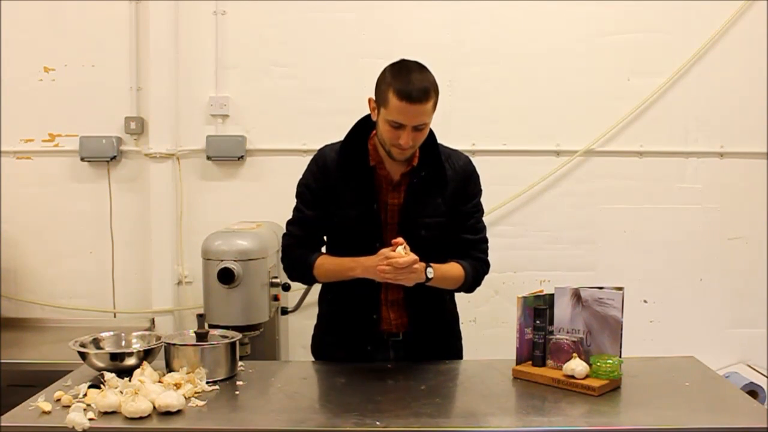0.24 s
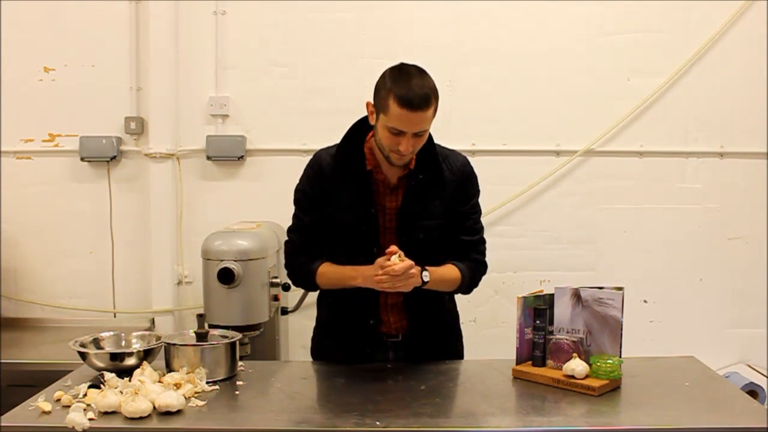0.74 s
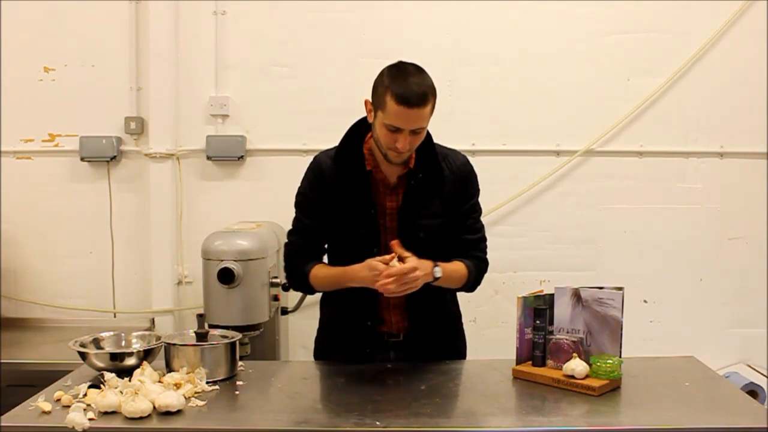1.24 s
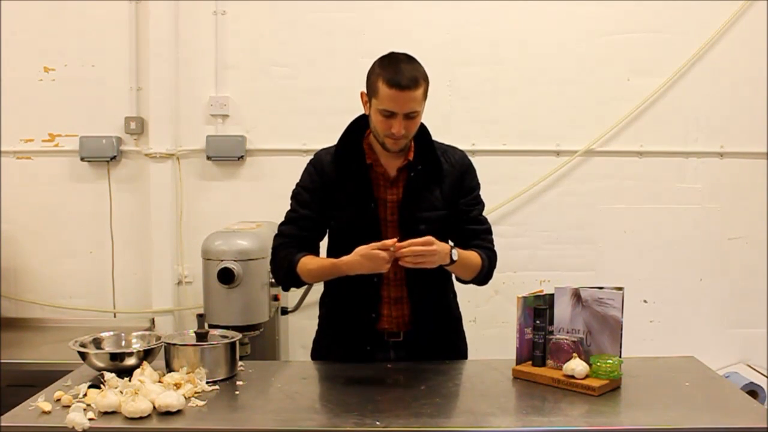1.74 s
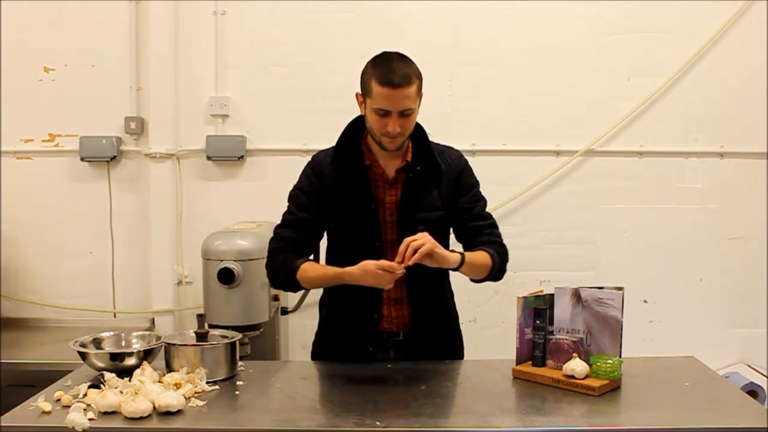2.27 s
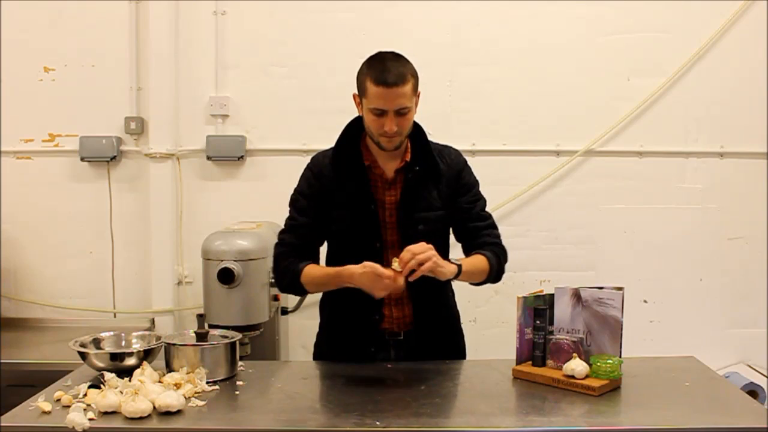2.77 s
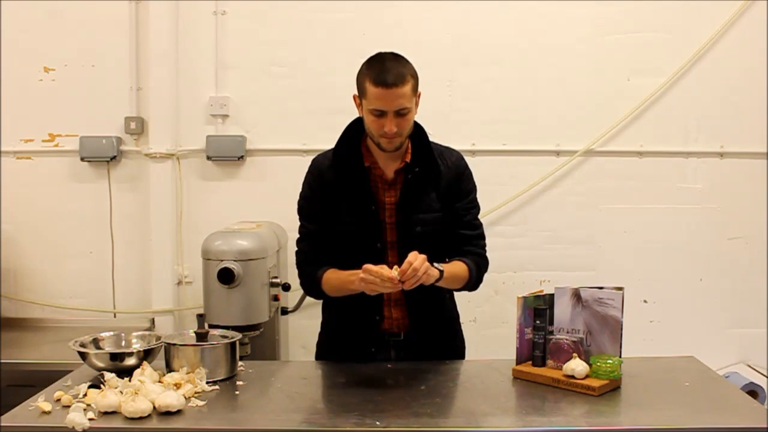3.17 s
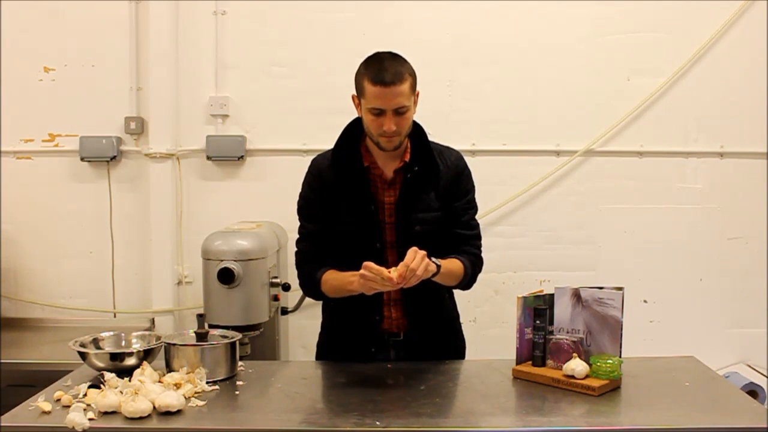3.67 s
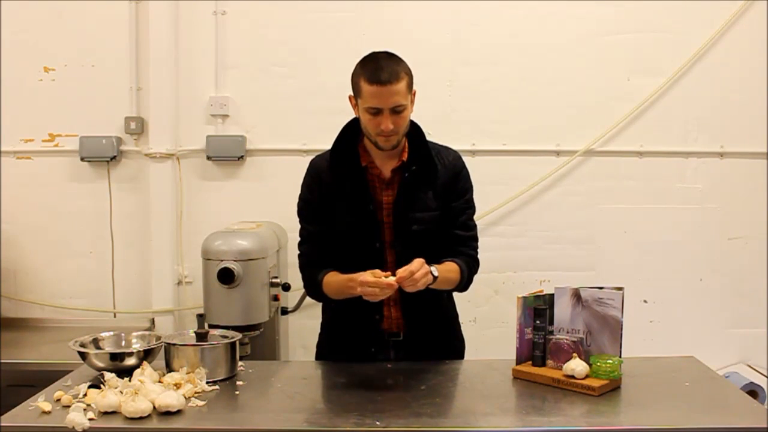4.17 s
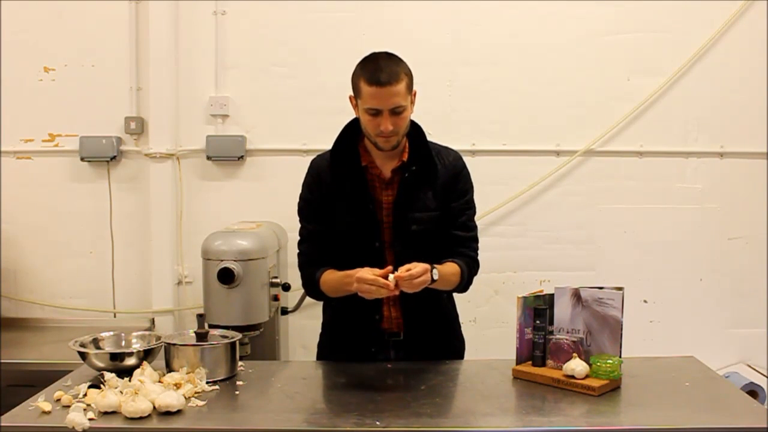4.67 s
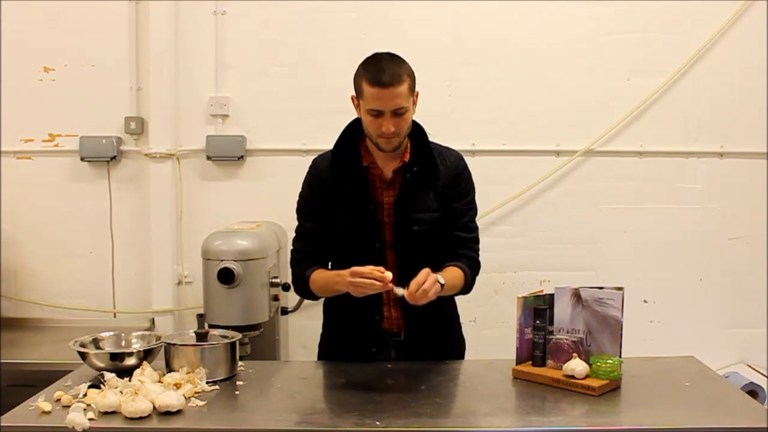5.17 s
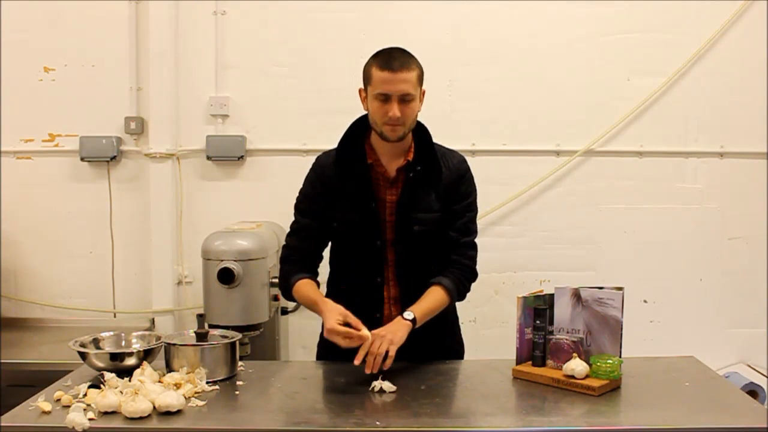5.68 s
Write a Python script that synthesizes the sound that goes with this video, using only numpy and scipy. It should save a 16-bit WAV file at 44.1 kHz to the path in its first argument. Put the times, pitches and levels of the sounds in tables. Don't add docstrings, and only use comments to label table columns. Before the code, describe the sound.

A distant mono microphone hears fingers working dry garlic skin in a bare, hard-surfaced kitchen. Very short, bright snaps begin almost at once, with a strong crack near 0.45 s and several more between 0.7 and 1.1 s. From about 1.4 to 2.2 s there are mostly faint ticks, then a quick cluster at 2.3 s and another at 2.6 s. Tearing starts around 3.05 s with a rapid run of crisp crackles and papery rustle, followed by strong snaps at 3.65 and 4.13 s, the loudest. Activity thins after 4.4 s, returns as a sharp burst at 4.9-5.15 s, and ends with small cracks and soft dull knocks near 5.5 s. Each snap bounces off bench and walls, leaving a thin tail of up to a second. Underneath is quiet, steady ventilation, a wavering low hum, and a trace of distant traffic rumble fading at the start. Only room air remains to about 5.9 s.

```python
import sys
import numpy as np
from scipy import signal
from scipy.fft import rfft, irfft
from scipy.io import wavfile
from scipy.ndimage import uniform_filter1d

SR = 44100
rng = np.random.default_rng(int(sys.argv[2]) if len(sys.argv) > 2 else 0)


def invert_db(x):
    u = np.asarray(x, float) / 20
    return 10 ** u


def store_wav(level_fs):
    pcm = np.round(np.clip(np.atleast_2d(level_fs), -1, 1) * 32767)
    wavfile.write(sys.argv[1], SR, pcm.T.astype(np.int16))


N = 260833
SNAP_SAMPLES = 512


def shaped(x, hz, db):
    f = np.maximum(np.fft.rfftfreq(len(x), 1 / SR), 1)
    gain = invert_db(np.interp(np.log(f), np.log(hz), db))
    return irfft(rfft(x) * gain, len(x))


def bump(hz, octaves):
    f = np.maximum(np.fft.rfftfreq(SNAP_SAMPLES, 1 / SR), 1)
    return np.exp(-0.5 * (np.log2(f / hz) / octaves) ** 2)


def ragged(decay_s, first):
    t = np.arange(SNAP_SAMPLES // 2) / SR
    burst = rng.standard_normal((len(decay_s), len(t))) * np.exp(-t / decay_s[:, None])
    burst[:, 0] = first
    spectrum = rfft(burst, SNAP_SAMPLES)
    return spectrum / np.abs(spectrum) ** 0.5


def snaps(times_s, peak_db, colours, decay_s, wet_db):
    out = np.zeros((2, N + SNAP_SAMPLES))
    lead = SNAP_SAMPLES // 8
    spectra = ragged(decay_s + 0 * times_s, 2.43) * colours
    waves = np.roll(irfft(spectra, SNAP_SAMPLES), lead, axis=1)
    waves *= (invert_db(peak_db) / np.abs(waves).max(axis=1))[:, None]
    for s, wave, wet in zip(times_s, waves, invert_db(wet_db + 0 * times_s)):
        i = max(int(s * SR) - lead, 0)
        out[:, i:i + SNAP_SAMPLES] += np.array([wave, wet * wave])
    return out[:, :N]


def skin_snaps(s, peak_db, ring_hz, ring_db, edge_hz, wet_db):
    ring = np.array([bump(f, 0.16) + 0.74 * bump(f, 0.72) for f in ring_hz])
    edge = np.array([0.95 * bump(f, 0.19) + 1.09 * bump(12200, 0.58) for f in edge_hz])
    colours = invert_db(ring_db + 9.5)[:, None] * ring + invert_db(-15) * edge
    return snaps(s + 0.0012, peak_db, colours, 0.00042, wet_db)


def contacts(rows, wet_db):
    s, peak_db, hz, octaves = np.transpose(rows)
    colours = np.array([bump(f, w) for f, w in zip(hz, octaves)])
    return snaps(s + 0.001012, peak_db, colours, 0.00051, wet_db)


def walk(rate_hz):
    k = int(SR / rate_hz)
    steps = np.repeat(rng.standard_normal(N // k + 1), k)
    smooth = uniform_filter1d(steps, k)[:N]
    return smooth / smooth.std()


# time in s, peak in dB, flake ring in Hz, ring # in dB, edge in Hz.
HARD_CRACKS = [(0.0874, -14.5, 5120, -14, 12100), (0.168, -26, 7600, -3, 7900),
               (.3537, -25, 5600, -38, 11000), (.451, -9, 4400, -24, 11800),
               (0.5197, -20, 5930, 2, 10300), (0.7246, -16, 6200, -8, 8440),
               (.733, -14.5, 3100, -22, 8600), (.817, -18.5, 5500, 1, 7900),
               (0.8262, -30, 4100, -2, 11200), (1.024, -25.5, 4200, -22, 12000),
               (1.0856, -17, 4170, -33, 13300), (1.4306, -24, 5100, -43, 12800),
               (2.294, -19.5, 4000, -20, 7500), (2.3138, -29, 3840, -10, 13100),
               (2.3245, -17, 4900, -17.5, 11100), (2.3342, -23.5, 5100, -30, 12500),
               (2.6038, -22.5, 5290, -23, 10800), (2.6194, -16.5, 5320, 0, 11500),
               (2.6424, -26, 5670, -16, 9250), (2.933, -27.5, 7600, -33, 8000),
               (3.049, -11.5, 6200, -31, 13500), (3.053, -22.5, 4100, -21, 14500),
               (3.0999, -19, 6950, -23, 9700), (3.107, -25, 7760, -30, 10500),
               (3.131, -15.5, 6300, -32, 13500), (3.1712, -29, 8000, -28, 11000),
               (3.182, -17.5, 8000, -33, 10400), (3.2138, -22, 5850, -19, 11500),
               (3.5133, -16.5, 6130, -23, 12000), (3.635, -25, 5650, -24, 12600),
               (3.6484, -9.5, 6510, -41, 12000), (3.7305, -14.5, 7460, -24, 9600),
               (3.756, -17.5, 6500, -16, 10100), (3.932, -19, 5350, -25.5, 14000),
               (4.0787, -16, 6600, -20, 12000), (4.107, -27, 7250, -3, 8800),
               (4.125, -7.5, 5450, -20.5, 8750), (4.171, -17, 7790, -20, 13500),
               (4.1817, -19, 5660, -11, 8810), (4.239, -17, 4600, -33, 12900),
               (4.2805, -20, 5200, -21, 13400), (4.292, -21, 5000, -18, 10400),
               (4.4166, -24, 6300, -20, 9500),
               (4.6395, -20.5, 6540, -9, 8780), (4.9197, -24.5, 8000, -38, 11000),
               (4.97, -19, 5100, -9.5, 10000), (5.005, -21, 5780, -18, 11600),
               (5.017, -25, 7440, -24, 9110), (5.0237, -15.5, 7700, -21, 9150),
               (5.107, -12.5, 7100, -17.5, 14700), (5.139, -11, 5700, -29.5, 12000),
               (5.4726, -22, 4740, -21, 9000), (5.5016, -24, 4560, -28, 9000)]


def cracks():
    s, peak_db, ring_hz, ring_db, edge_hz = np.transpose(HARD_CRACKS)
    wet_db = -1 - 0.028 * (peak_db + 15) + 0.05 * (ring_db + 14)
    return skin_snaps(s, peak_db, ring_hz, ring_db, edge_hz, wet_db)


# time in s, peak in dB, ring in dB.
TICKS = [(.192, -33, -8), (.3076, -43, -17), (0.3783, -33, -20), (0.5994, -34, -6), (.621, -28.5, -18),
         (0.9968, -31.5, -31), (1.1653, -35.5, -20), (1.513, -30.5, -19), (1.5378, -39, -10),
         (1.6346, -35.5, -16), (1.791, -30.5, -18), (1.8165, -38, -18), (1.9524, -34, -17),
         (2.011, -45, -24), (2.0767, -34, -10), (2.1112, -27, -20), (2.208, -43, -6), (2.2783, -31, -18),
         (2.4837, -28, -38), (2.7513, -29, -22), (3.2233, -34, -3), (3.6131, -25.5, -20),
         (3.6267, -25, -12), (3.8547, -27, -36), (3.925, -25.5, -27), (4.0916, -23, -2), (4.374, -27, -17),
         (4.804, -41.5, -11), (4.9114, -30, -36), (4.956, -26, -31)]
# time in s, ring in Hz.
PIECE_RING = [(.6, 4370), (1.2, 4430), (1.52, 5470), (1.8, 4700), (2.2, 3300), (2.75, 5300), (3.22, 4570),
              (3.6, 5700), (4.1, 6550), (4.8, 4100), (4.95, 6400)]


def ticks():
    s, peak_db, ring_db = np.transpose(TICKS)
    ring_hz = np.interp(s, *np.transpose(PIECE_RING))
    edge_hz = 11500 * np.exp(0.08 * rng.standard_normal(len(s)))
    return skin_snaps(s, peak_db, ring_hz, ring_db, edge_hz, wet_db=2)


# time in s, peak in dB, ring in Hz, width in octaves.
CLOVE_BODY = [(0.0876, -38, 1380, 0.58), (1.2, -47, 2490, 0.35), (0.4486, -43, 2800, .25),
              (.7321, -41, 3030, .35), (0.8175, -34, 2800, 0.79), (2.116, -33, 3940, 0.42),
              (2.3028, -30.5, 3730, 0.18), (3.05, -33.5, 2980, 0.48), (3.0975, -39, 2680, .55),
              (3.2126, -34.5, 2560, 0.63), (3.515, -39, 2040, 0.39), (3.6491, -36, 1870, 0.98),
              (3.9317, -40.5, 2050, 0.4), (4.123, -54, 2010, 0.3), (4.2445, -38.5, 2100, .22),
              (4.9703, -34.5, 2250, 0.36), (5.0223, -34, 2600, 0.98), (5.05, -43, 1200, 0.43),
              (5.106, -33.5, 2720, 1), (5.471, -30.5, 2550, 0.72)]


def clove_body():
    return contacts(CLOVE_BODY, wet_db=-0.2)


# time in s,
# peak in dB, ring in Hz, width in octaves.
FLAKES = [(.002, -38, 3000, 0.3), (.088, -36, 8000, 0.081), (.451, -34, 5900, 0.12),
          (.4535, -25, 4300, 0.34), (.451, -35.5, 3200, 0.25), (.4535, -31, 14300, .1),
          (1.086, -44.5, 4100, 0.09), (1.431, -40, 5280, 0.13), (1.513, -49, 5500, .086),
          (3.516, -40, 6030, .2), (3.514, -45, 1880, 0.18), (4.64, -29, 8900, 0.16),
          (4.97, -37, 5660, 0.13), (5.14, -37, 5500, 0.085)]


def flakes():
    octaves = np.transpose(FLAKES)[-1]
    return contacts(FLAKES, wet_db=9.5 - 35 * octaves)


# time in s, level in dB.
BENDING = [(0, -48.5), (.48, -54), (.66, -48), (1.002, -54.5), (1.9, -57.5), (2.04, -47), (2.58, -47),
           (2.88, -59), (3.21, -36.5), (3.36, -60.5), (3.69, -40), (3.92, -52.5), (4.25, -38), (4.76, -56),
           (5.1, -35.5), (5.28, -47.5), (5.43, -58), (5.91, -62)]


def rustle():
    t = np.arange(N) / SR
    hit, size = rng.random(N), rng.exponential(size=N)
    sign = np.sign(rng.standard_normal(N))
    clicks = (hit < 600 / SR) * invert_db(5.2 * np.minimum(size, 4)) * sign
    clicks = clicks / clicks.std()
    body = shaped(clicks, [1500, 2650, 4320, 6800, 9500], [-23, -10.5, -1.0, -5.0, -3.5])
    other_clicks = np.roll(clicks, N // 3)
    edge = shaped(other_clicks, [4960, 8000, 12000, 16000], [-16, -11.0, 0.5, -27])
    effort_db = np.interp(t, *np.transpose(BENDING))
    return invert_db(effort_db - 7.0) * (body + invert_db(-10.5) * edge)


# time in s, peak in dB, ring in Hz, width in octaves.
KNUCKLE_KNOCKS = [(3.837, -58, 781, 0.15), (3.889, -48.5, 740, 0.19), (3.926, -50, 810, .25),
                  (4.107, -32, 1770, 0.4), (4.789, -53, 1170, 0.092), (5.472, -42.5, 850, 0.46),
                  (5.49, -51.5, 260, 0.25), (5.498, -44, 1150, 0.18)]


def knuckles():
    return contacts(KNUCKLE_KNOCKS, wet_db=-1.6)


# delay in s, level in dB, smear in s.
ECHOES = [(.0019, -5.5, 0.00056), (.0046, -12, .0003), (.0093, -5, .0002), (0.0109, -9.5, 0.00034),
          (0.016, -19.5, .0005), (.021, -33, 0.00026), (0.032, -18, .0004)]
# centre in Hz, T60 in s, level in dB.
TAIL = [(1020, 0.79, -27.5), (2000, 1.07, -28), (3830, 0.88, -26.5), (5500, 0.96, -29.5),
        (8000, 0.73, -31.5), (11500, 0.46, -30.5), (15000, 0.41, -32)]


def room():
    t = np.arange(int(1.3 * SR)) / SR
    log_hz = np.log(np.maximum(np.fft.rfftfreq(len(t), 1 / SR), 1))
    log_centres = np.log([row[0] for row in TAIL])
    noise = rfft(rng.standard_normal(len(t)))
    out = np.zeros(len(t))
    for share, (_, t60_s, db) in zip(np.eye(len(TAIL)), TAIL):
        band = irfft(noise * np.interp(log_hz, log_centres, share), len(t))
        out += invert_db(db - 60 * t / t60_s) * band
    out *= 1 - np.exp(-(t / 0.0095) ** 3)
    delay_s, echo_db, smear_s = np.transpose(ECHOES)
    for s, db, echo in zip(delay_s, echo_db, irfft(ragged(smear_s, 1.35), SNAP_SAMPLES)):
        i = int(s * SR)
        out[i:i + SNAP_SAMPLES] += invert_db(db) * echo / np.sqrt(np.sum(echo ** 2))
    return out


# frequency in Hz, density in dB per Hz.
AIR_SPECTRUM = [(35, -31), (60, -10.5), (137, -3.5), (304, -5), (464, -7), (559, -8), (691, -6),
                (938, -4.5), (1080, -12.5), (2350, -15), (2580, -20), (3260, -15.5), (8750, -25),
                (14000, -32), (16500, -47)]


def ventilation():
    noise = shaped(rng.standard_normal(N), *np.transpose(AIR_SPECTRUM))
    return invert_db(-56.5 + 0.5 * walk(1.86)) * noise / noise.std()


# time in s, level in dB.
FAN_LOAD = [(0, -85), (1.3, -68), (1.8, -78), (2.8, -69.5), (4.7, -68.5), (5.5, -63.5), (5.91, -66)]


def fan():
    t = np.arange(N) / SR
    hum_hz, whine_hz, whine_db = 121.9, 204.1, -70
    hum_level = invert_db(np.interp(t, *np.transpose(FAN_LOAD)) + 1.4 * walk(5.5))
    hum = hum_level * np.sin(2 * np.pi * hum_hz * t + 0.94 * walk(5.4))
    whine = invert_db(whine_db + 1.7 * walk(7)) * np.sin(2 * np.pi * whine_hz * t + 1.4 * walk(8))
    return hum + whine


def traffic():
    t = np.arange(N) / SR
    start_db, fade_s, rest_db, sag_db_per_s = -59.5, 0.2, -73, -0.4
    noise = shaped(rng.standard_normal(N), [25, 45.4, 59.0, 86], [-34, -5, -2, -31.5])
    level = invert_db(start_db) * np.exp(-t / fade_s) + invert_db(rest_db + sag_db_per_s * t)
    return level * noise / noise.std()


def scene():
    out = ventilation() + fan() + traffic()
    skin = cracks() + ticks()
    handling = clove_body() + flakes() + knuckles() + rustle()
    for direct, towards_walls in (skin, handling):
        out = out + direct + signal.fftconvolve(towards_walls, room())[:N]
    return out[None]


def roll_off(x):
    return signal.sosfilt(signal.butter(12, 16990, fs=SR, output="sos"), x)


def record(dry):
    top_cut = signal.ellip(8, 0.3, 40, 15700, fs=SR, output="sos")
    mix = signal.sosfilt(top_cut, dry)
    return roll_off(mix)


dry = scene()
out = record(dry)
store_wav(out)
```